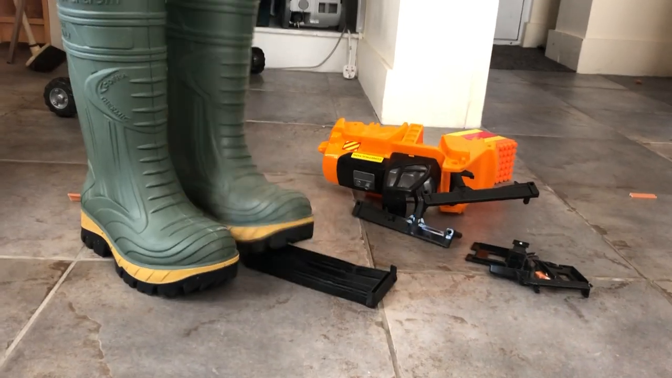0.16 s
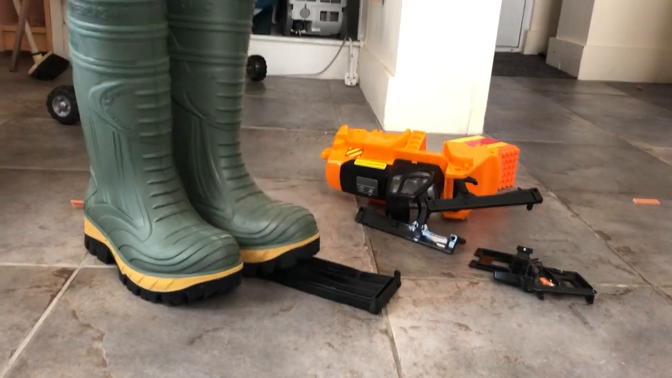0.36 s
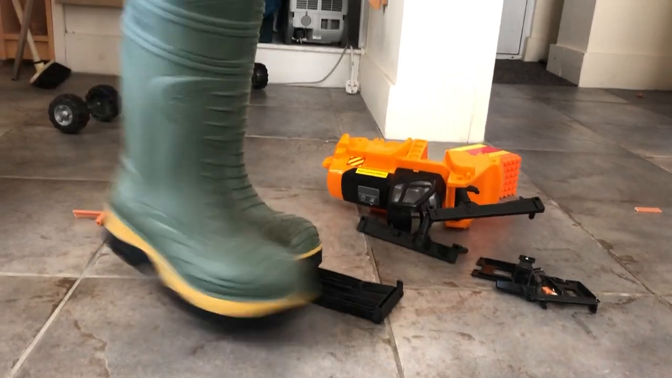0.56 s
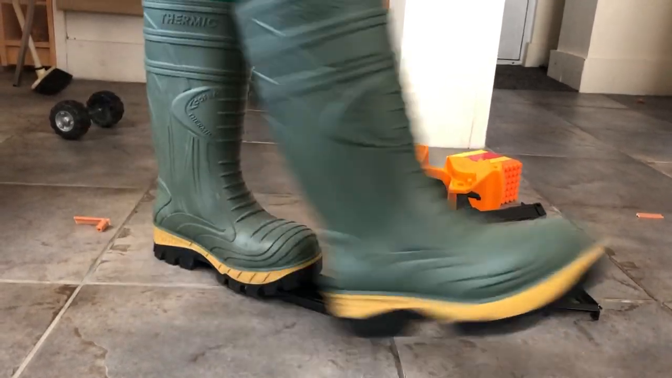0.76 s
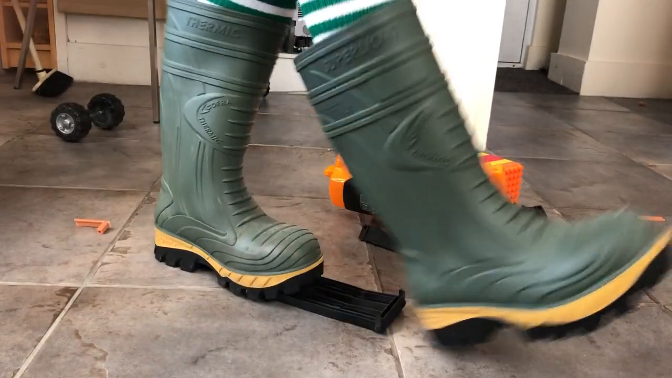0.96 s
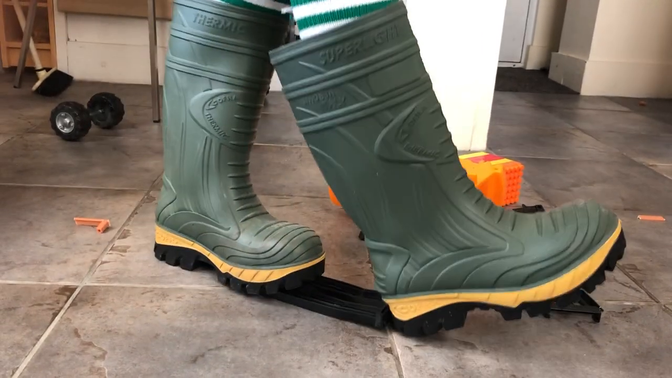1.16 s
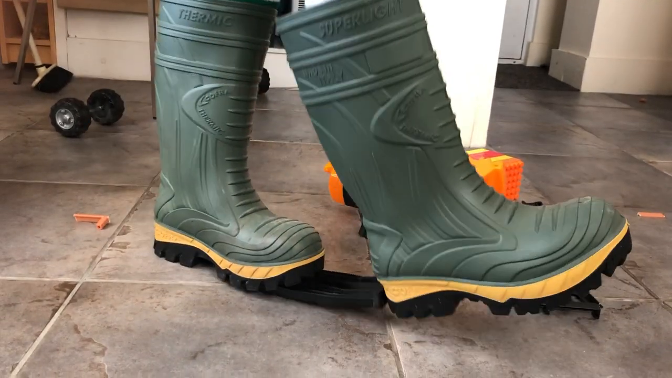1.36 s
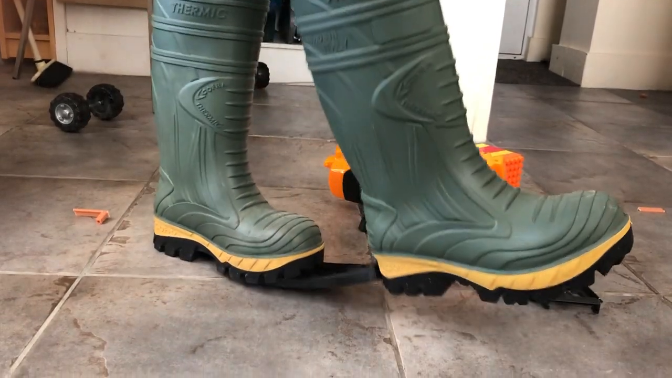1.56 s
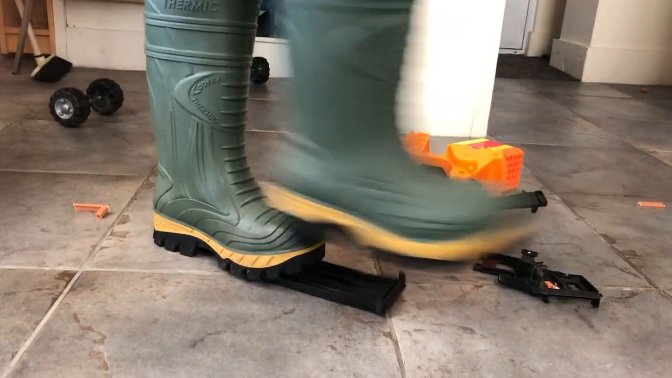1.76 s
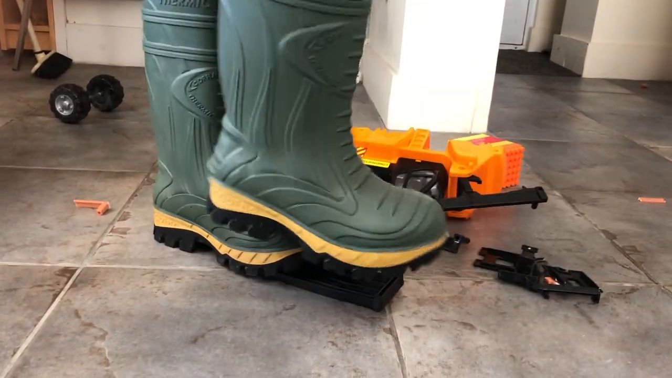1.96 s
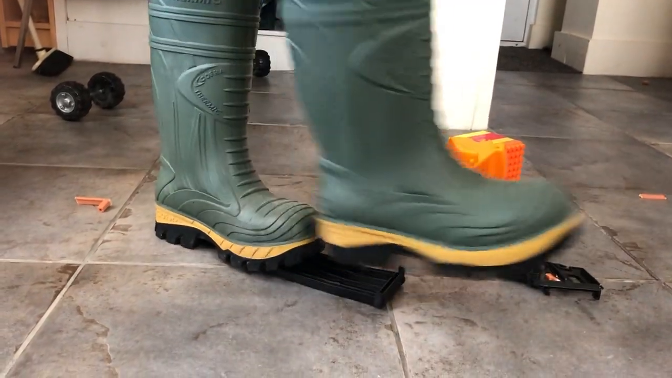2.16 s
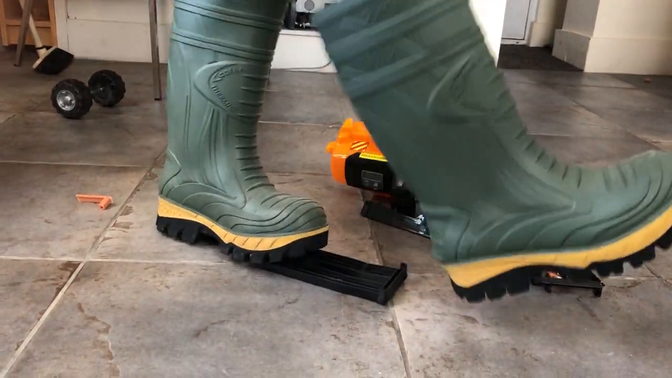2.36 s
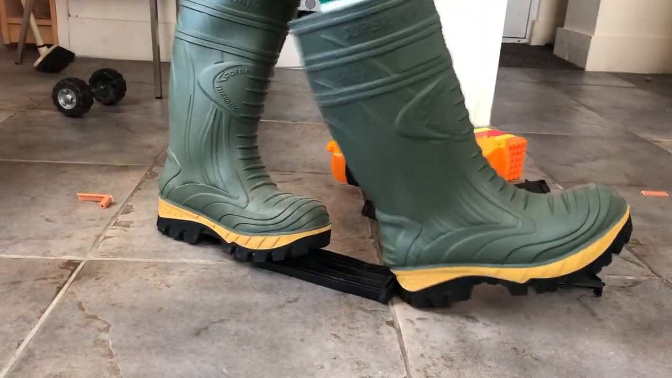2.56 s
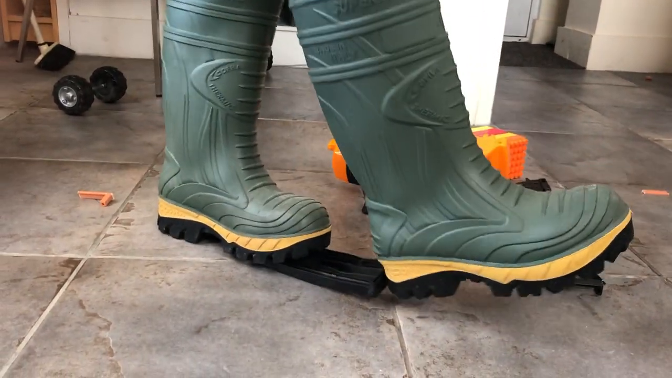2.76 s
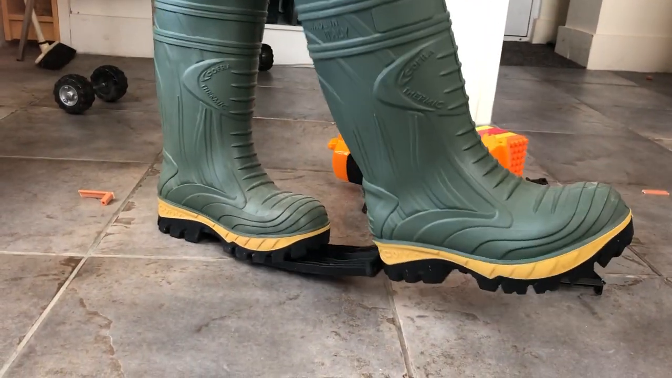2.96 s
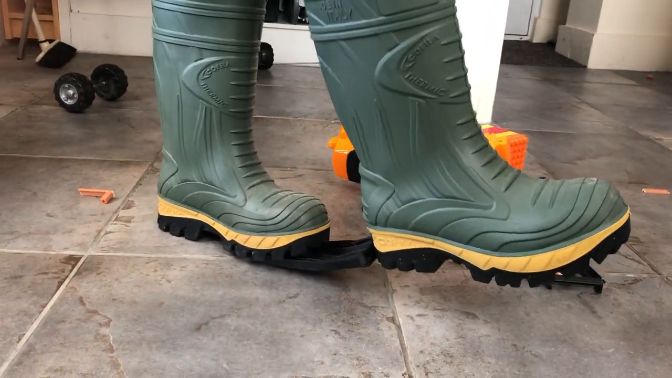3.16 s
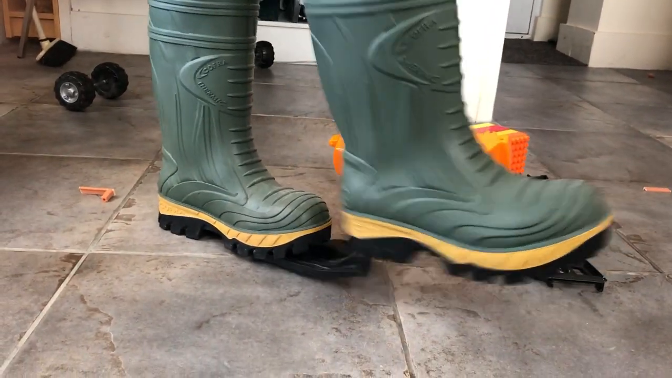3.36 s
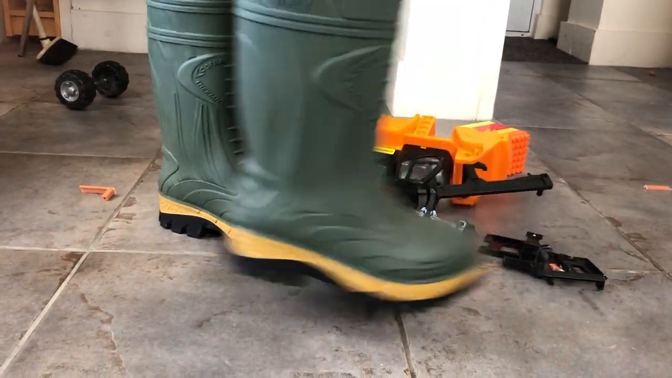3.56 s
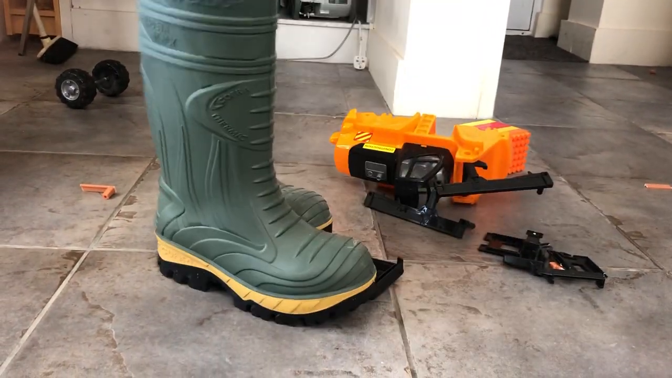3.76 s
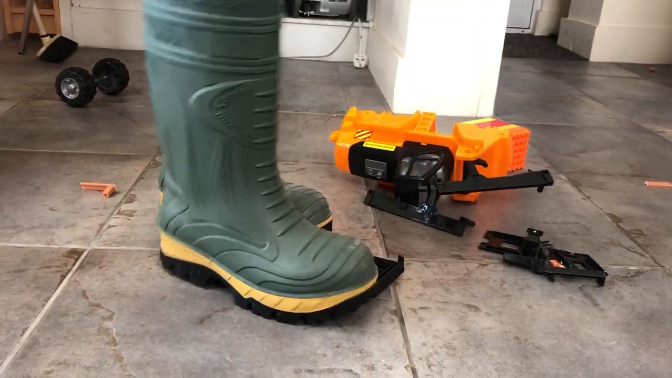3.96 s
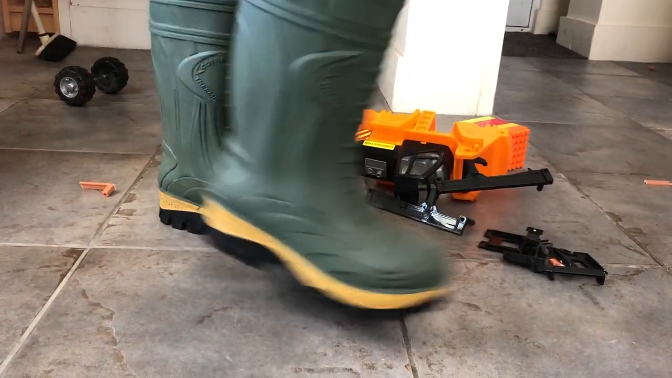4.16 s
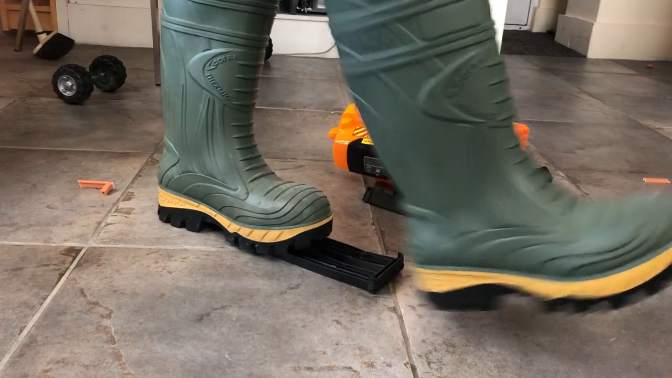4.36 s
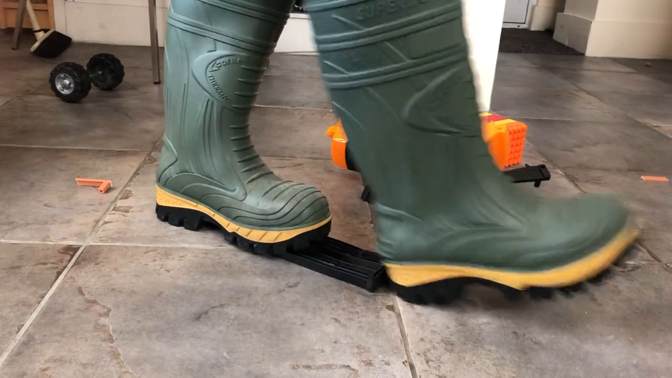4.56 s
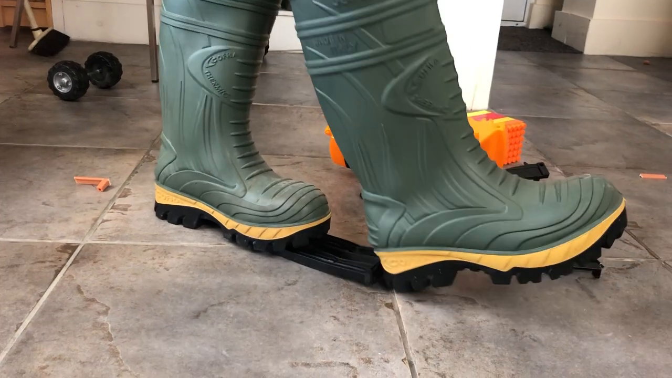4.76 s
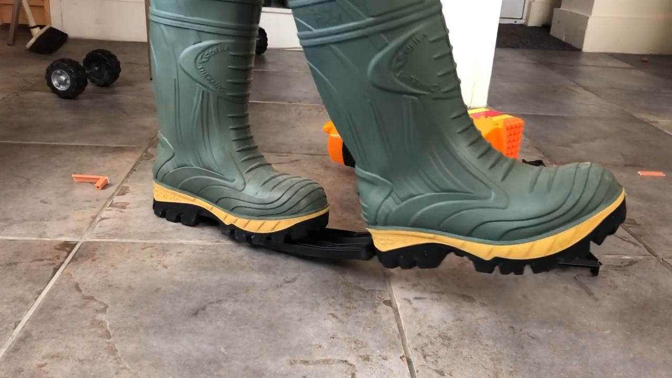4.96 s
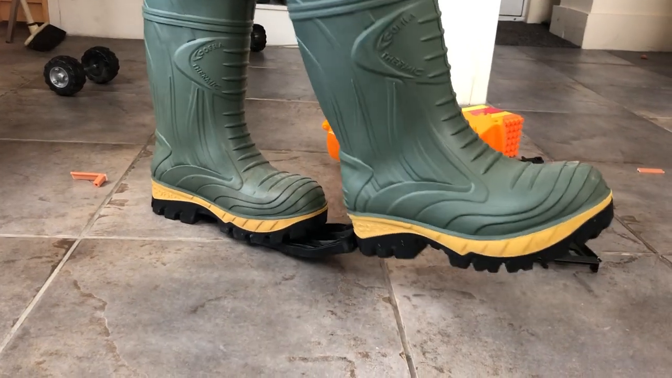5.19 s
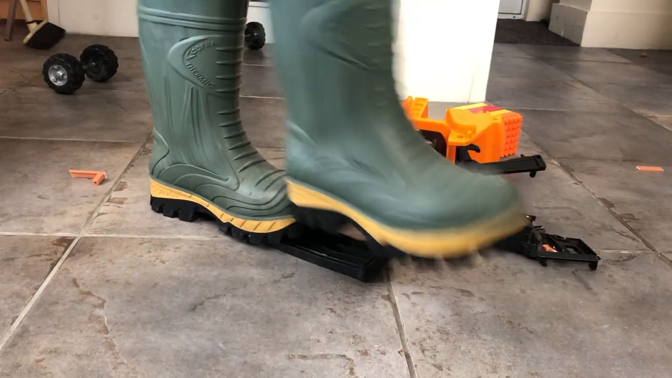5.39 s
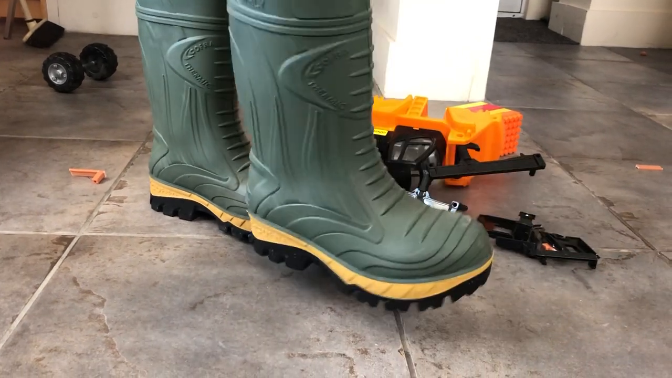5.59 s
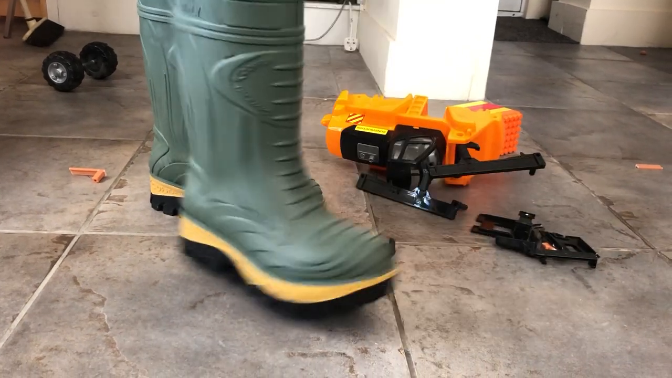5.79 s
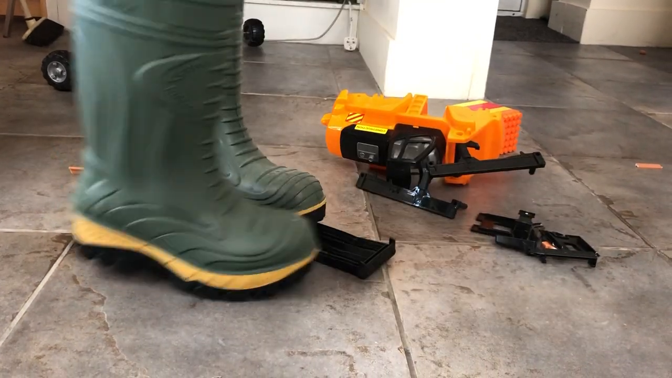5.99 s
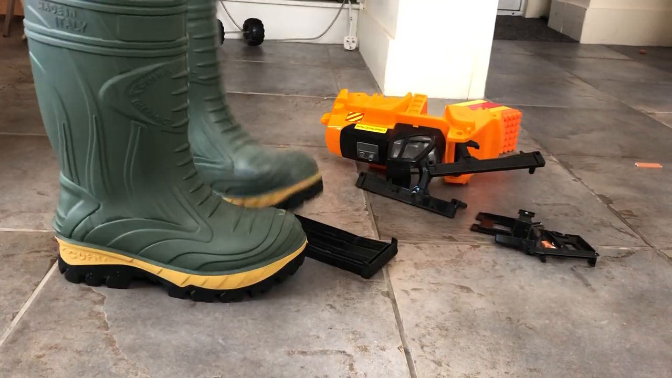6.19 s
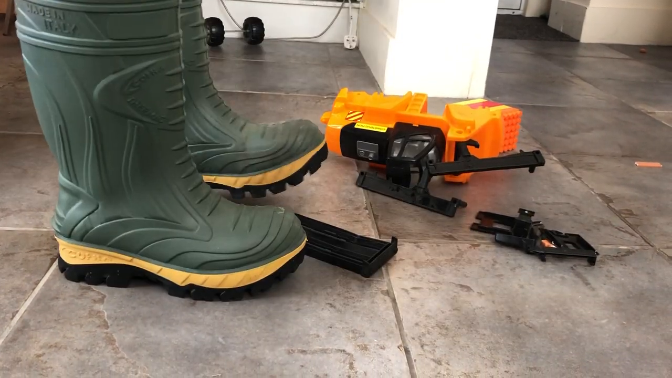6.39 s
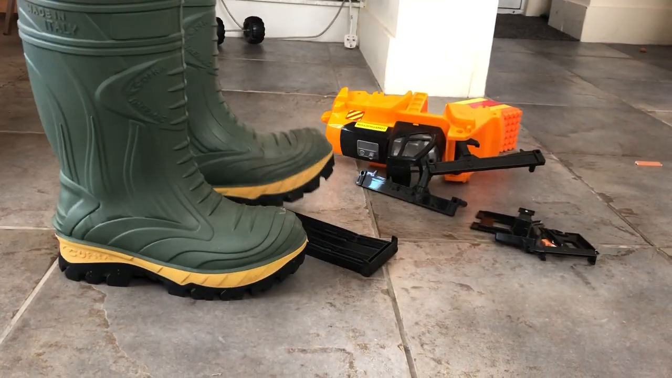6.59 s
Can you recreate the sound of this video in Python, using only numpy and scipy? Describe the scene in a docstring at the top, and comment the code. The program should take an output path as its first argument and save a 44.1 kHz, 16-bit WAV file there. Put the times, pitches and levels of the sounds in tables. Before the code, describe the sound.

Indoors over a faint hum, heavy boots clack and tip a hard plastic piece, then snap it violently three times, leaving ticking fragments.

```python
"""An appliance hums in a reverberant room while a plastic toy part rattles faintly on the tiles.
Rubber boots then stamp on it three times: each tear is a run of noise bursts exciting decaying modes.
Before each stamp the heel is set down and the sole tips the part, which clacks against the floor.
Filtered bursts make the thuds, shaped noise the presses and brushes, decaying noise the reverberation.
The recorder's limiter clamps each crack and lets the room swell up behind it."""
import sys
import numpy as np
from scipy import signal
from scipy.fft import rfft, irfft
from scipy.io import wavfile
from scipy.ndimage import uniform_filter1d, minimum_filter1d

SR = 44100
rng = np.random.default_rng(int(sys.argv[2]) if len(sys.argv) > 2 else 0)


def int16_out(signal):
    """Quantize to a 16-bit WAV file."""
    q = np.round(np.clip(np.atleast_2d(signal).T, -1, 1) * 32767)
    wavfile.write(sys.argv[1], SR, q.astype(np.int16))


N = 292383
TIME = np.arange(N) / SR


def amp(db):
    """Logarithmic level: converts decibels to an amplitude gain."""
    return 10 ** (np.asarray(db) / 20)


def evened(x):
    """Power normalization: scales a signal to an rms of one."""
    return x / np.sqrt(np.mean(x ** 2) + 1e-20)


def read(points, hz):
    """Spectral interpolation: reads (frequency, value) points on a log-frequency axis."""
    point_hz, value = np.transpose(points)
    return np.interp(np.log(hz + 1), np.log(point_hz + 1), value)


def add(mix, s, sound):
    """Superposition: mixes a sound in at time s."""
    part = mix[max(round(s * SR), 0):][:len(sound)]
    part += sound[:len(part)]


def noise(gain, size):
    """Spectral shaping: noise of rms one, filtered by gain(Hz)."""
    spectrum = rfft(rng.standard_normal(size))
    return evened(irfft(spectrum * gain(np.fft.rfftfreq(size, 1 / SR)), size))


def causal(gain, size=4096):
    """Minimum phase: the quickest impulse response whose magnitude spectrum is gain(Hz)."""
    log_gain = np.log(gain(abs(np.fft.fftfreq(size, 1 / SR))) + 1e-5)
    # The Hilbert transform of the log magnitude supplies the phase.
    return np.fft.ifft(np.exp(np.conj(signal.hilbert(log_gain)))).real


def burst(decay_s, hold_s=0, size=8192, count=3):
    """Broadband impact: noise of unit energy and nearly even spectrum, held for hold_s and then dying."""
    fade = np.exp(-np.maximum(np.arange(size) / SR - hold_s, 0) / decay_s)
    x = rng.standard_normal(size) * fade
    # Alternately flatten the spectrum and restore the decay.
    for _ in range(count):
        flat = irfft(np.exp(1j * np.angle(rfft(x))))
        x = flat * np.sqrt(fade)
    return x / np.linalg.norm(x)


def wavering(hz, width_hz):
    """Narrow-band noise: a tone whose level and pitch wander."""
    return noise(lambda f: 1 / (1 + ((f - hz) / width_hz) ** 4), N)


# Spectrum of the room air: (frequency [Hz], relative level [dB])
AIR_SPECTRUM = [(15, -71.5), (25, -42.5), (59, -13.5), (102, -10.5), (123, -16), (141, -4.5), (157, -5.5),
                (229, -14), (326, -12), (476, -24), (575, -18.5), (1650, -30.5), (3430, -34), (14400, -47),
                (16000, -49.5)]
# Course of the air noise: (time [s], rms level [dB])
AIR_LEVEL = [(0, -53), (1.65, -57), (2.4, -60), (3.2, -62), (4.4, -59), (5.3, -59), (6.6, -58.5)]
# Partials of the appliance hum: (frequency [Hz], relative level [dB])
HUM = [(158.3, -61.5), (199.2, -68), (317.6, -74), (414.5, -86.5), (516.8, -81), (592.2, -79)]
# Faint late whine: (frequency [Hz], rms level [dB])
WHINE = [(1723, -81), (2260, -78.5), (2880, -76)]
WHINE_FULL_S, WHINE_FADE_S = 5.9, .1  # the fade-in ends at the first time


def background(hum_width_hz=4, whine_width_hz=40, hum_db=1):
    """Stationary noise and tones: room air, an appliance's unsteady hum and a whine that fades in."""
    air_gain = amp(np.interp(TIME, *np.transpose(AIR_LEVEL)))
    air = noise(lambda f: amp(read(AIR_SPECTRUM, f)), N) * air_gain
    hum = np.zeros(N)
    for hz, db in HUM:
        steady = np.sin(2 * np.pi * hz * TIME)
        hum += amp(db + hum_db) * evened(steady + 0.31 * wavering(hz, hum_width_hz))
    whine = sum(amp(db) * wavering(hz, whine_width_hz) for hz, db in WHINE)
    whine_fade = np.clip((TIME - WHINE_FULL_S) / WHINE_FADE_S + 1, 0, 1)
    return air + hum + whine * whine_fade


# Boots brushing past each other and over the tiles:
# (time of the middle [s], peak level [dB], half length to 1/e [s], turnover of the spectrum [Hz])
BRUSHES = [(0.012, -52, 0.044, 2510), (0.62, -61, 0.035, 12300), (0.894, -73, 0.27, 10600),
           (1.195, -61.5, 0.022, 3470), (4.248, -62.5, 0.07, 5130), (6.085, -61, 0.25, 2100)]


def brushes():
    """Friction noise: sliding rubber gives soft swells of broad hiss."""
    out = np.zeros(N)
    for s, db, half_s, hz in BRUSHES:
        swell = np.exp(-((TIME - s) / half_s) ** 2)
        out += amp(db) * swell * noise(lambda f: (f / hz) / (1 + (f / hz) ** 3), N)
    return out


# The part rocks from edge to edge, more weakly each time:
# (time [s], relative level [dB], length [s], top edge [dB])
RATTLES = [(.002, -45.5, .025, -17), (5.8393, -35, .04, -10), (6.2405, -51, .087, -33)]
ROCK_GAP_S, ROCK_FADE_DB_PER_S = .0155, 97
ROCK_MS, ROCK_BODY_DB, ROCK_RING_DB = 2.62, 16, -2.5  # of each knock
# The trodden part slaps the tile:
# (time [s], relative level [dB], length [ms], hollow body [dB], top edge [dB], ring [dB])
CLACKS = [(.094, -46.5, 4, 4, -40, -11), (.3023, -26, 1.7, -5, -15, -13), (.351, -51.5, 5.4, 23, 0, -14),
          (1.199, -52, 2.2, 20, -29, -8), (3.7425, -28, 3.5, 16, -6.5, 0),
          (3.756, -10.5, 2.2, 1.5, -2.5, -13), (5.884, -21.5, 6, 7.5, -5.5, -12)]
# The heel is set down: (time [s], relative thud level [dB])
HEELS = [(1.102, -41), (2.548, -42), (4.575, -40.5)]
HEEL_TICK_DB = -19.5  # the tread's tick on the tile, relative to the heel thud
# Then the toe comes down and tips the part:
# (time [s], relative clack level [dB], top edge [dB], ring [dB], relative thud level [dB])
TOES = [(1.1919, -47, -32, 4, -48), (2.6342, -36.5, -11.5, 2.5, -43.5), (4.678, -34, -6, -1.5, -38.5)]
# The tread first meets the shell: (time [s], relative level [dB])
CATCHES = [(1.7864, -36.5), (3.4616, -25.5), (5.404, -36)]
# The sole bears down on the shell until the plastic tears and scatters chips:
# (time of the break [s], relative level [dB], tear length [ms], ring [dB], top edge [dB],
#  press level [dB], relative thud level [dB], relative chip level [dB])
STAMPS = [(1.8101, 9.5, 2.6, -22, 2.5, -19, -40.5, 14.5), (3.484, 7.5, 5.6, -13, -1.5, -33.5, -25, 18),
          (5.4275, 10, 5.8, -21, 1.5, -30.5, -21.5, 14)]
# The boot comes off and the part springs back:
# (time [s], relative click level [dB], ring [dB], relative thud level [dB])
LIFTS = [(3.3455, -43, -14.5, -46), (4.2475, -43, 1, -46), (5.3464, -49.5, -17, -58.5)]
# Kinds of snap: (length [ms], hollow body [dB], top edge [dB], ring [dB]), less what a row above gives
CATCH = (2.04, -0.5, 1.5, -15)
HEEL_TICK = (4, 19, -3, -8)
TOE_CLACK = (1.26, 10.9)
SPRING_BACK = (2.2, 9, 0.99)


def all_snaps():
    """Impact sequence: (s, relative level dB, length ms, hollow body dB, top edge dB, ring dB)."""
    rows = CLACKS + [(s, db + HEEL_TICK_DB, *HEEL_TICK) for s, db in HEELS]
    for s, db in CATCHES:
        rows += grazed(s, db, *CATCH)
    for s, db, tear_ms, ring_db, edge_db, *_ in STAMPS:
        rows += tear(s, db, tear_ms, ring_db, edge_db)
    for s, db, edge_db, ring_db, _ in TOES:
        rows += grazed(s, db, *TOE_CLACK, edge_db, ring_db)
    for s, db, ring_db, _ in LIFTS:
        rows += grazed(s, db, *SPRING_BACK, ring_db)
    for s, db, length_s, edge_db in RATTLES:
        for age in np.arange(0, length_s, ROCK_GAP_S):
            knock_db = db - ROCK_FADE_DB_PER_S * age
            rows += [(s + age, knock_db, ROCK_MS, ROCK_BODY_DB, edge_db, ROCK_RING_DB)]
    return rows


GRAZE_LEAD_S, GRAZE_DB = .0028, -13.5


def grazed(s, db, *kind):
    """Double contact: one edge touches lightly just before the rest of the part."""
    return [(s - GRAZE_LEAD_S, db + GRAZE_DB, *kind), (s, db, *kind)]


FRACTURE_SHARE = .36  # length of one fracture as a share of the whole tear
FRACTURE_BODY_DB = 1.5  # how much of the hollow body sounds in a fracture
TEAR_GROWTH_DB = 26.5  # a tear swells by this much, quickly at first, up to the break


def tear(s, db, length_ms, ring_db, edge_db, count=3):
    """Progressive fracture: a quick run of growing cracks that ends in the break at time s."""
    rows = []
    for early in np.linspace(1, 0, count):
        crack_s = s - early * length_ms / 1000
        crack_db = db - TEAR_GROWTH_DB * early ** 2
        rows += [(crack_s, crack_db, FRACTURE_SHARE * length_ms, FRACTURE_BODY_DB, edge_db, ring_db)]
    return rows


# Colour of a snap: (frequency [Hz], relative level [dB])
SNAP_COLOUR = [(30, -40.5), (70, -12.5), (150, -10), (280, -9.5), (500, -12), (950, -12), (1700, -3),
               (2400, -7.5), (3600, -2), (5200, 0.5), (8300, 0), (11000, -7.5), (16000, -12)]


def snaps(body_hz=1900, middle_low_hz=4000, middle_high_hz=5600, edge_hz=11000, size_db=24.5,
          dying_s=.0006, scatter_s=0.0056, scatter_db=-8):
    """Brittle fracture: each snap is a run of tiny cracks, scattered at once by boots and floor."""
    out = np.zeros(N)
    for s, db, length_ms, body_db, edge_db, _ in all_snaps():
        tint = [(body_hz, body_db), (middle_low_hz, 0), (middle_high_hz, 0), (edge_hz, edge_db)]
        colour = causal(lambda f: amp(read(SNAP_COLOUR, f) + read(tint, f)), size=2048)
        direct = burst(dying_s, length_ms / 1000, size=1024)
        scattered = amp(scatter_db) * burst(scatter_s, size=1024)
        add(out, s, amp(db + size_db) * signal.fftconvolve(direct + scattered, colour))
    return out


# Modes of the plastic part: (frequency [Hz], relative level [dB], t60 [s])
PART = [(1623, -3, 0.09), (1760, -5, 0.09), (1945, -7.5, .1), (3195, -4, 0.08), (3500, -6.5, .07),
        (3727, -3.5, .07), (4100, -7.5, 0.13), (5050, -7, 0.11), (5240, -7, 0.033), (5260, -10.5, 0.021),
        (6530, -10.5, 0.027), (7000, -10.5, .03)]


def rings(size_db=17):
    """Modal vibration: each snap rings the part's modes, which the weight of the boot detunes a little."""
    out, t = np.zeros(N), np.arange(SR // 6) / SR
    for s, db, *_, ring_db in all_snaps():
        ring = np.zeros(len(t))
        for hz, mode_db, t60 in PART:
            detuned_hz = hz * rng.uniform(0.94, 1.02)
            ring += amp(mode_db - 60 * t / t60) * np.sin(2 * np.pi * detuned_hz * t)
        add(out, s, amp(db + size_db + ring_db) * ring / np.linalg.norm(ring))
    return out


def room(common, count=4):
    """Directivity: a fracture sends a different waveform each way, and each way returns its own tail."""
    directions = [signal.oaconvolve(common + snaps(), tail())[:N] for _ in range(count)]
    return sum(directions) / np.sqrt(count)


# Reverberation time of the room: (frequency [Hz], t60 [s])
ROOM_T60 = [(80, 0.49), (300, 0.34), (800, 0.39), (2000, 0.32), (5500, 0.37), (9000, 0.3), (15000, 0.3)]
# Strength of the reverberation: (frequency [Hz], level over the direct sound [dB])
ROOM_DB = [(80, -1), (200, -1), (420, -2), (1500, -4), (5500, -1.5), (15000, -3)]


def tail(build_s=0.0063, first_s=0.0028):
    """Diffuse reverberation: dense reflections build up, then each band dies at its own speed."""
    age = np.arange(SR * 3 // 4) / SR
    hz, t, z = signal.stft(rng.standard_normal(len(age)), SR, nperseg=256)
    t60 = read(ROOM_T60, hz)[:, None]
    decay = amp(read(ROOM_DB, hz)[:, None] - 60 * t / t60)
    # Keeps a band's energy independent of how long it rings.
    energy_gain = np.sqrt(2 * np.log(1000) / (t60 * SR))
    reflections = signal.istft(z * decay * energy_gain, SR, nperseg=256)[1][:len(age)]
    return reflections * np.clip((age - first_s) / build_s, 0, 1) ** .5


# Loose pieces left shivering: (time [s], initial rms level [dB], t60 [s])
SHIVERS = [(0.303, -42, 0.081), (3.488, -12, 0.26), (3.764, -26, 0.24)]
SHIVER_HZ, SHIVER_SPREAD_HZ = 4890, 370


def shivers(count=90):
    """Modal density: a close cluster of high modes rings on in the loose pieces after a knock."""
    out, t = np.zeros(N), np.arange(SR // 2) / SR
    modes_hz = SHIVER_HZ + SHIVER_SPREAD_HZ * rng.standard_normal((count, 1))
    for s, db, t60 in SHIVERS:
        cycles = modes_hz * t + rng.random((count, 1))
        ring = np.sin(2 * np.pi * cycles).sum(0)
        add(out, s, evened(ring) * amp(db - 60 * t / t60))
    return out


# Steps on the spot, after which the weight settles:
# (time [s], relative thud level [dB], decay [s], relative settling level [dB])
STEPS = [(.305, -52, 0.094, -49), (3.723, -37, 0.05, -34), (5.85, -44, 0.066, -45),
         (6.111, -56.5, 0.02, -52.5)]
STEP_LOW_HZ, STEP_HIGH_HZ = 84.7, 516
SETTLE_S = 0.055  # from a step to the settling of the weight
# The two boots knock together: (time [s], relative thud level [dB])
BUMPS = [(2.002, -39), (2.2, -53)]
# Kinds of thud: (decay [s], lower turnover [Hz], upper turnover [Hz])
STAMP_THUD = (.024, 150, 150)
HEEL_THUD = (0.0275, 48, 204)
SETTLE_THUD = (0.019, 51, 210)
LIGHT_THUD = (0.0076, 85, 480)


def all_thuds():
    """Soft-impact sequence: (s, relative level dB, decay s, lower turnover Hz, upper turnover Hz)."""
    rows = [(s, db, *STAMP_THUD) for s, *_, db, _ in STAMPS]
    rows += [(s, db, *HEEL_THUD) for s, db in HEELS]
    rows += [(s, db, *LIGHT_THUD) for s, *_, db in TOES + LIFTS + BUMPS]
    for s, db, decay_s, settle_db in STEPS:
        rows += [(s, db, decay_s, STEP_LOW_HZ, STEP_HIGH_HZ), (s + SETTLE_S, settle_db, *SETTLE_THUD)]
    return rows


def thuds(steepness=2.39, boom_hz=63, boom_width_hz=12, boom_db=2):
    """Compliant contact: soft rubber passes only the low part of a blow, and the floor resonates."""
    def rubber(f):
        """Band-pass filtering: the band of one blow, lifted at the floor's resonance."""
        boom = 1 + amp(boom_db) / (1 + ((f - boom_hz) / boom_width_hz) ** 2)
        return boom * f ** 4 / (f ** 4 + low_hz ** 4) / (1 + (f / high_hz) ** steepness)

    out = np.zeros(N)
    for s, db, decay_s, low_hz, high_hz in all_thuds():
        thud = signal.fftconvolve(burst(decay_s), causal(rubber))
        # Energy grows with the decay time.
        add(out, s, amp(db) * np.sqrt(decay_s * SR) * thud / np.linalg.norm(thud))
    return out


# Resonances of the hollow shell: (frequency [Hz], full width at half amplitude [Hz], relative level [dB])
SHELL = [(620, 1000, -13.5), (1100, 1000, -6), (1670, 280, 0.5), (3150, 110, 0.5)]
PRESS_S = .02  # how long the sole bears down before the break


def presses(swell_db=20, lowest_hz=130):
    """Friction-driven resonance: the sole rubs the shell, louder and louder until the plastic gives."""
    def shell(f):
        """Radiation efficiency: a small hollow body radiates its resonances and no deep bass."""
        resonances = sum(amp(db) / (1 + (2 * (f - hz) / width) ** 2) for hz, width, db in SHELL)
        return resonances * f ** 2 / (f ** 2 + lowest_hz ** 2)

    out = np.zeros(N)
    size = round(PRESS_S * SR)
    for s, *_, db, _, _ in STAMPS:
        swell = amp(db + np.linspace(-swell_db, 0, size))
        add(out, s - PRESS_S, noise(shell, size) * swell * signal.windows.tukey(size, .1))
    return out


# Loose chips tick under a step or a scuffing, lifting boot:
# (time [s], relative level of the first chips [dB])
CRUNCHES = [(3.73, 6), (4.235, -23), (5.873, -1)]


def chips(count=26, after_s=.02, last_s=.1, spread_db=4):
    """Random impacts: after a stamp, crunching step or scuff, chips tick ever more faintly."""
    out = np.zeros(N)
    colour = causal(lambda f: amp(read(SNAP_COLOUR, f)))
    for s, *_, db in STAMPS + CRUNCHES:
        for age, size in rng.random((count, 2)):  # age is a share of last_s
            chip = signal.fftconvolve(burst(0.0003, size=256), colour)
            chip_db = db + spread_db * (2 * size - 2.5) - 25 * age
            add(out, s + after_s + last_s * age, amp(chip_db) * chip)
    return out


def scene():
    """Superposition of direct sound, reverberation and background."""
    common = rings() + chips() + presses() + thuds() + shivers() + brushes()
    return (snaps() + common + room(common) + background())[None]


EDGE_HZ = 16050


def record(dry, ceiling_db=-5, quick_db_per_s=260, slow_db_per_s=11, slow_share=0.43):
    """Dynamic range limiting: gain recovers quickly at first, then slowly; a low-pass then limits the band."""
    peak = -minimum_filter1d(-abs(dry[0]), size=48)
    over_db = np.maximum(20 * np.log10(peak + 1e-9) - ceiling_db, 0)
    # A running maximum against a ramp makes the reduction fall at a constant rate.
    quick = np.maximum.accumulate(over_db + quick_db_per_s * TIME) - quick_db_per_s * TIME
    slow = np.maximum.accumulate(slow_share * over_db + slow_db_per_s * TIME) - slow_db_per_s * TIME
    reduction_db = uniform_filter1d(np.maximum(quick, slow), size=32)
    limited = dry / amp(reduction_db)
    low_pass = signal.firwin(511, EDGE_HZ, window=("kaiser", 9), fs=SR)
    return signal.oaconvolve(limited, low_pass[None], "same")


dry = scene()
out = record(dry)
int16_out(out)
```